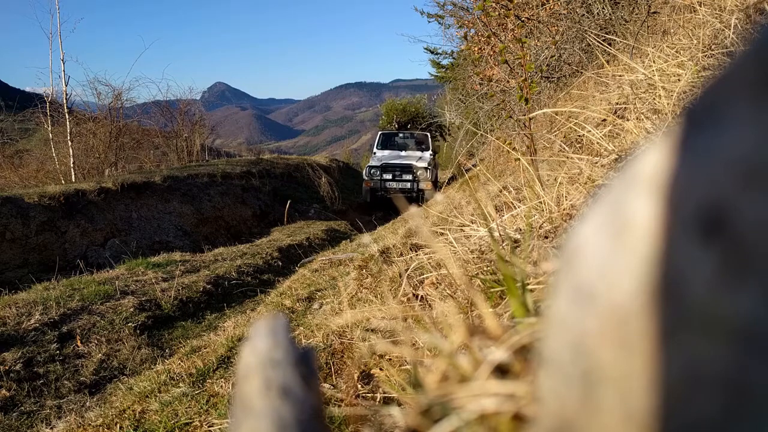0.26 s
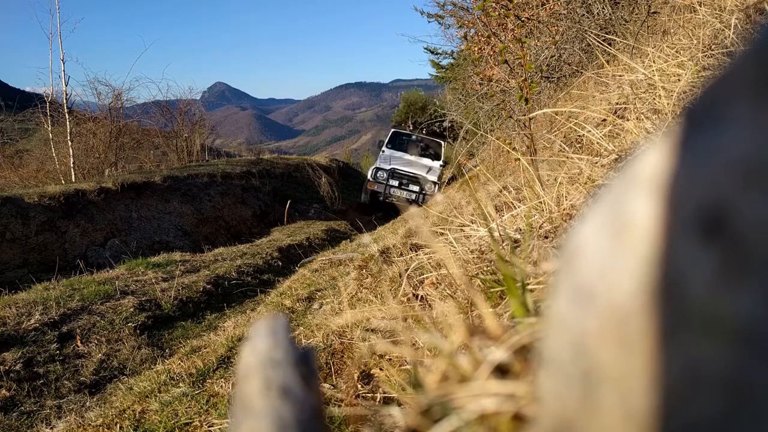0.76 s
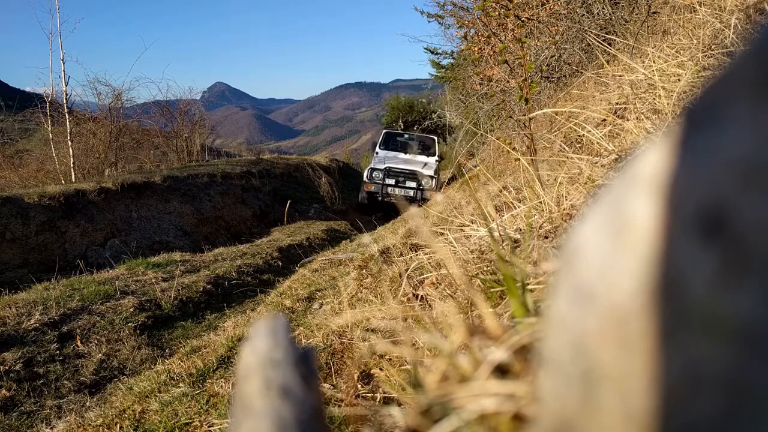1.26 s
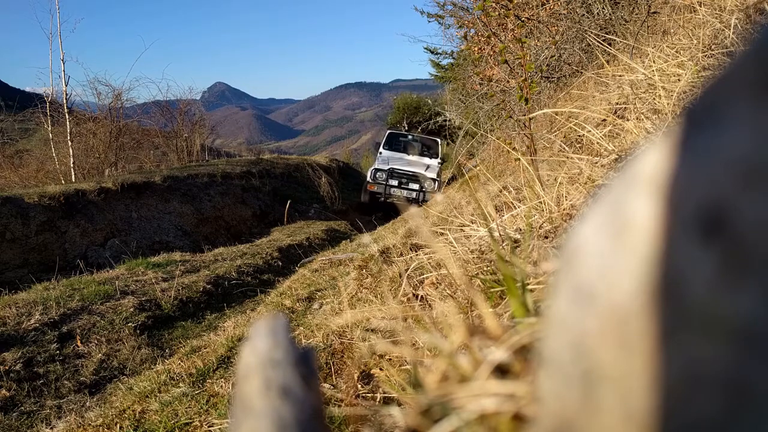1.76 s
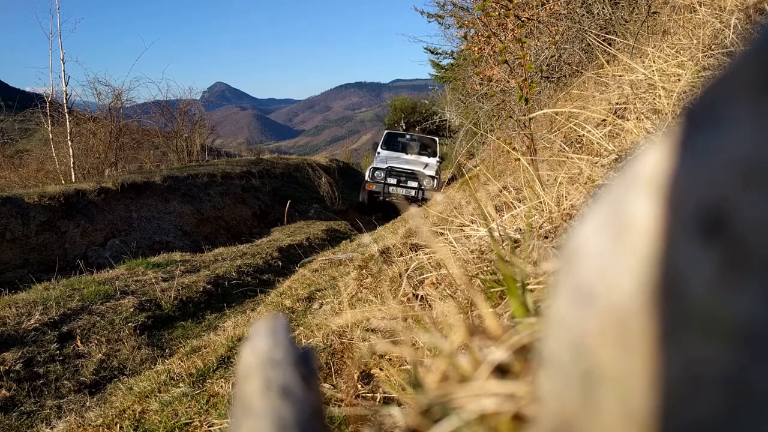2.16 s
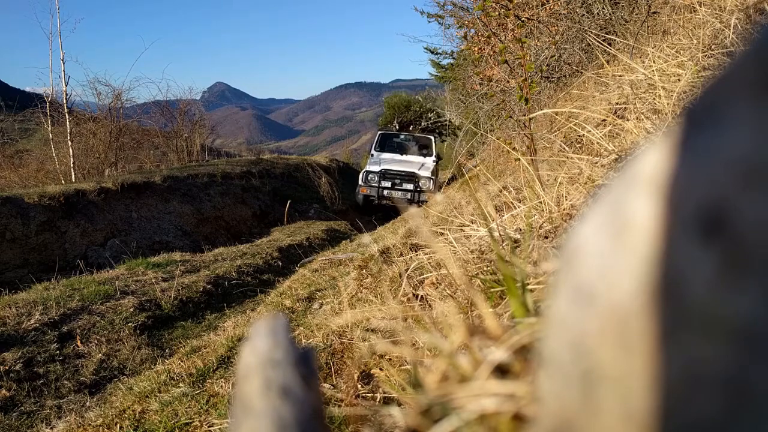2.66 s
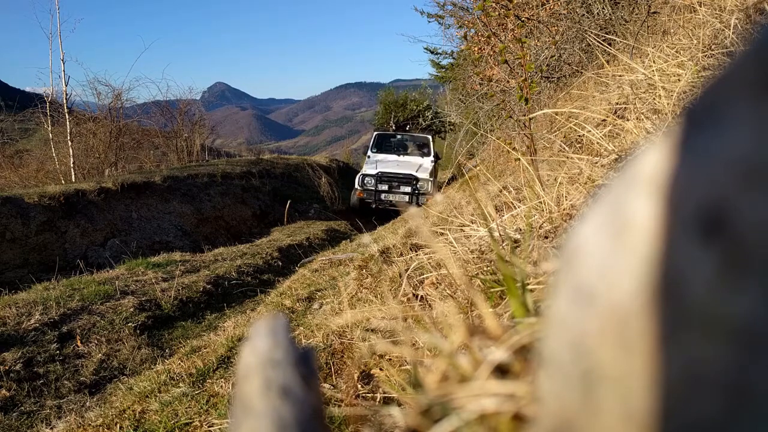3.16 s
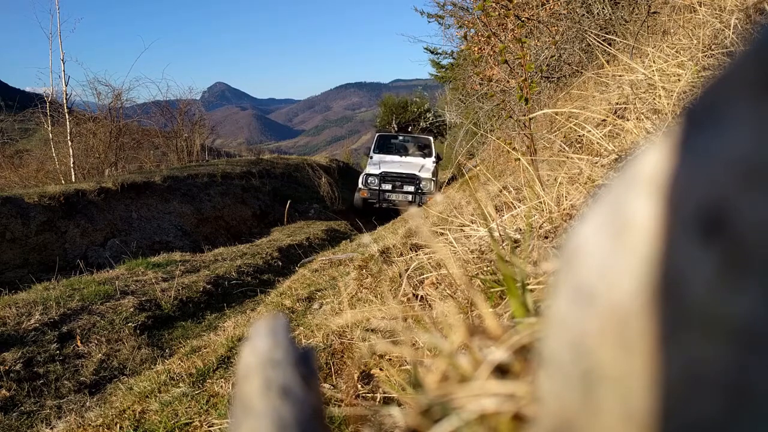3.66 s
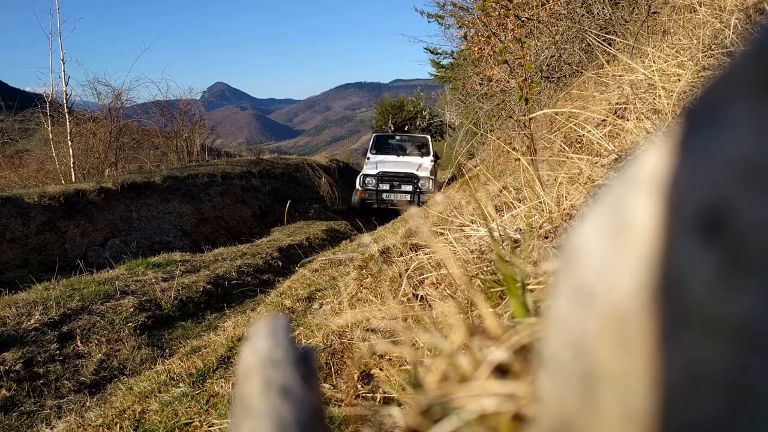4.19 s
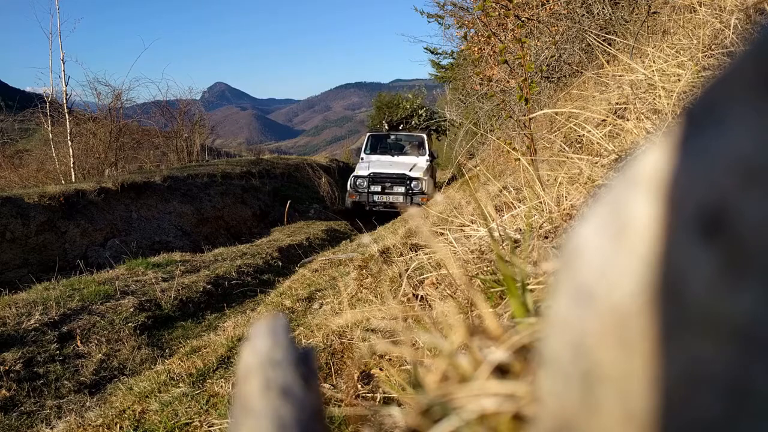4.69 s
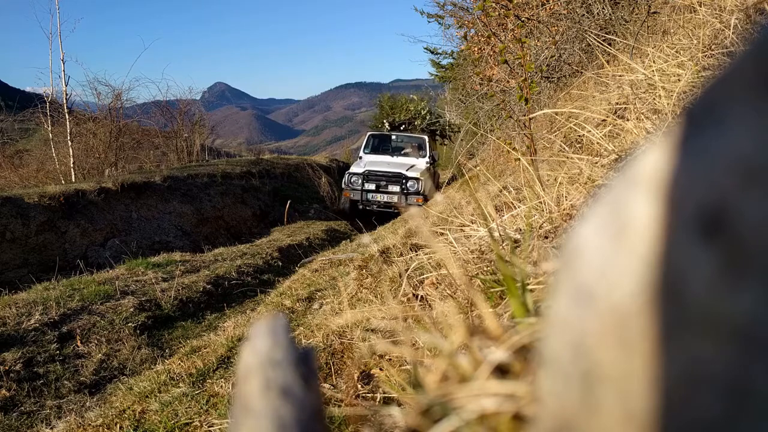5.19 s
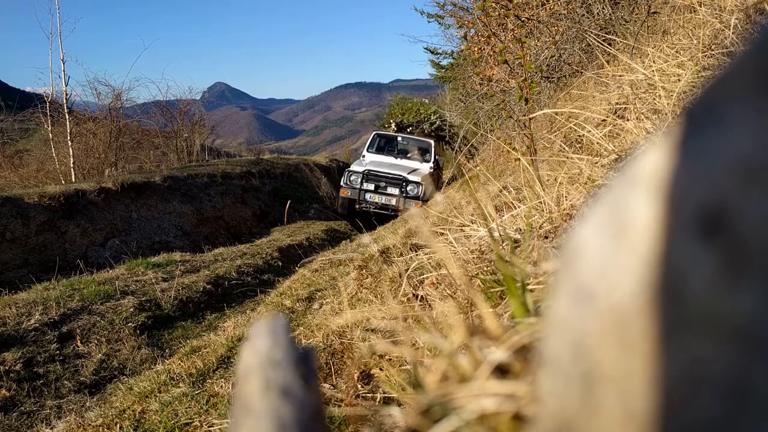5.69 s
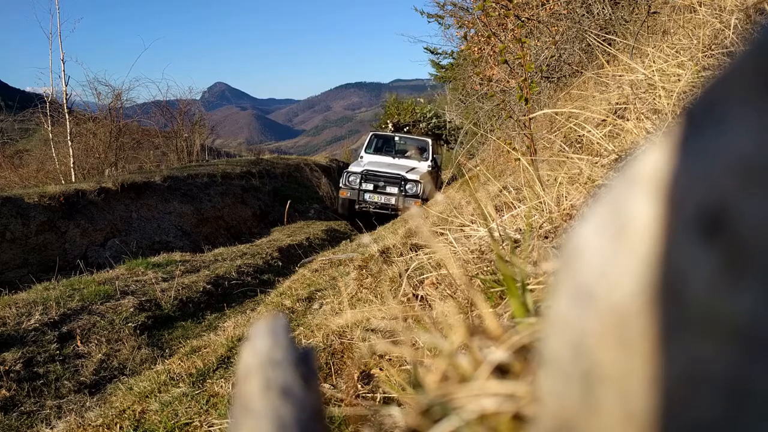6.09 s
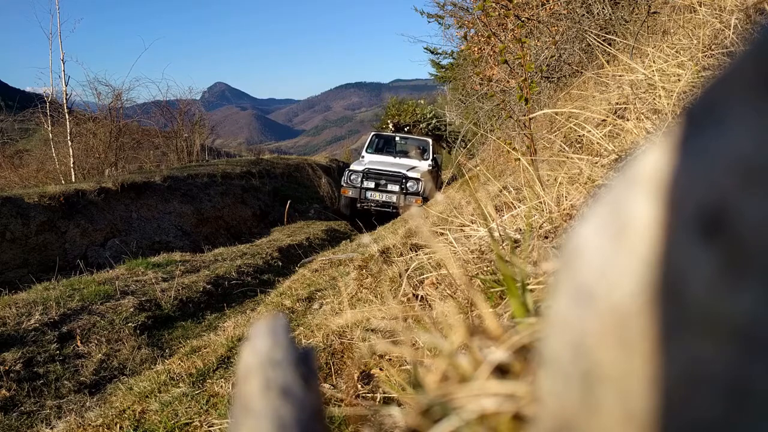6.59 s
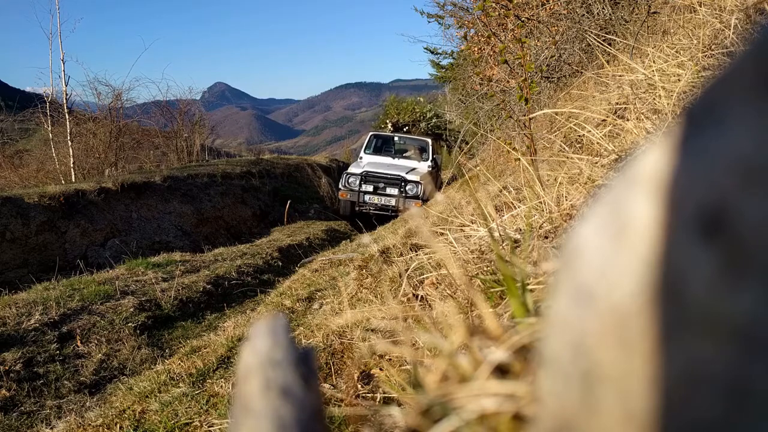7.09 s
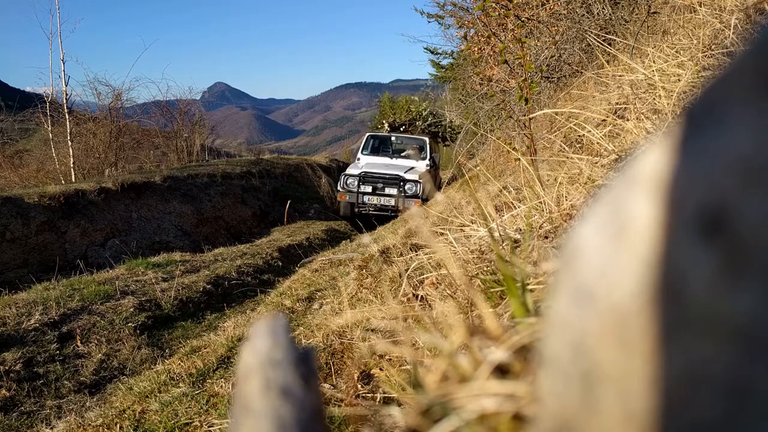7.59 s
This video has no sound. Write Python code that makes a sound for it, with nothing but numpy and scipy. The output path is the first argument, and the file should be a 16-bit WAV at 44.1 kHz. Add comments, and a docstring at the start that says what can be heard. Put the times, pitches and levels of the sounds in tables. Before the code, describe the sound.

Outdoors, a small four-cylinder off-road car works slowly across rutted ground, picked up in mono by a fixed camera microphone with faint hiss and a very faint high whine. At 0 s the engine is high with a strong low boom, falling by 0.6 s to a rough chug. It revs up from 1.5 to 2 s, sinks by 2.4 s, and a low creak comes around 2.7 s. Revs climb again from 3.3 s, peaking loudest near 3.9 s, then drop into a heavy, loaded growl at 4.2 s. A low groan follows at 4.7 s; around 5.1 s the engine almost bogs down, its boom gone, with small squeaks. It recovers through 6 s, then flutters up and down until nearly 8 s, with brighter rumble, metallic clatter and ringing panels. Dry grass and soil fizz quietly under the tyres throughout.

```python
"""Outdoors on rutted ground, a small four-cylinder off-road car crawls about, its engine revving up and down.
The exhaust is three tones locked to the firings, plus noisy puffs sent through ringing pipes and panels.
The engine bay is coloured noise and ticks that get louder with speed. Springs and bushes squeak as short stacks
of overtones, and the tyres rustle as noise with sparse snaps.
The camera adds hiss, a faint whine and a steady offset, and cuts the deep bass and the highest treble."""
import sys
import numpy as np
from scipy import signal
from scipy.fft import rfft, irfft
from scipy.io import wavfile
from scipy.ndimage import uniform_filter1d

SR = 44100
rng = np.random.default_rng(int(sys.argv[2]) if len(sys.argv) > 2 else 0)


def inscribe(sig):
    """Save sig as 16-bit PCM at rate SR to the path in sys.argv[1].

    A 1-D sig is mono; a 2-D sig holds one channel per row.
    Samples are clipped to [-1, 1] before scaling.
    """
    pcm = np.round(np.clip(np.atleast_2d(sig).T, -1, 1) * 32767)
    wavfile.write(sys.argv[1], SR, pcm.astype(np.int16))


N = 346174

# How the engine runs. Each row: time in seconds, firings per second in Hz, firing tone in dB rms,
# load in dB (it lifts the overtones and rumble fully, the clatter and rustle in part).
ENGINE_RUN = [(0.0, 112, -29.5, 3), (0.13, 90.8, -29, -0.5), (0.24, 75.76, -39, 3.5), (0.36, 80, -42, 2.5),
              (0.46, 67.3, -42.5, -1.5), (0.61, 47.9, -42.5, 4), (0.83, 49.9, -41.5, 0),
              (1.2, 48.14, -43, -4), (1.44, 54.62, -40, -2), (1.55, 73.65, -42, 5),
              (1.68, 90.24, -43.5, -1.5), (1.81, 89.1, -38, -3.5), (1.97, 97.34, -43, -2),
              (2.12, 76, -37, -0.5), (2.27, 51.9, -40.5, 8), (2.41, 43.2, -43, 4), (2.64, 52.04, -39, 2),
              (2.75, 48.8, -38, 6.5), (3.21, 55.4, -41.5, -1), (3.37, 72.74, -41.5, 3),
              (3.52, 92.7, -44.5, -2), (3.63, 93, -35, -4), (3.74, 91.75, -37, 1.5),
              (3.87, 114.9, -34, 3.5), (4.07, 87.8, -31.5, 2), (4.15, 66.07, -31, 12.5),
              (4.22, 59.66, -32, 7.5), (4.33, 56.73, -33.5, 5), (4.44, 67.66, -37.5, 4),
              (4.68, 50.2, -39, 2.5), (4.92, 38.96, -50, 3.5), (5.11, 37.05, -81, -1.5),
              (5.3, 37, -66, 0.5), (5.53, 44.94, -46.5, -1), (5.77, 49.07, -41.5, -1),
              (6.23, 53.6, -40, -2.5), (6.44, 76.73, -41.5, 1.5), (6.57, 73.34, -42, 3.5),
              (6.71, 88.07, -46, 5.5), (6.8, 99, -40.5, 3), (6.97, 71.93, -41.5, 7),
              (7.19, 83.25, -43, 4.5), (7.43, 73.73, -40.5, 5.5), (7.61, 93.4, -45, 4.5),
              (7.85, 63.4, -34, 11)]


def gain_of(db):
    """Turns decibels into a factor on the amplitude."""
    return 10 ** (np.asarray(db) / 20)


def evened(x):
    """Scales a signal to an rms of 1."""
    return x / np.sqrt(np.mean(x ** 2) + 1e-20)


def shaped(x, points):
    """Filters x by a spectrum drawn on a log-frequency axis, then scales it to rms 1."""
    points_hz, points_db = np.transpose(points)
    hz = np.fft.rfftfreq(len(x), 1 / SR)
    spectrum_db = np.interp(np.log(hz + 1), np.log(points_hz + 1), points_db)
    return evened(irfft(rfft(x) * gain_of(spectrum_db), len(x)))


def resonate(x, hz, width):
    """A two-pole resonance (width in Hz) of gain 1 at its centre, like a part that rings at one pitch."""
    return signal.lfilter(*signal.iirpeak(hz, hz / width, SR), x)


def drift(per_s):
    """Slow random wandering of about rms 1, with changes up to about per_s Hz."""
    knots_per_s = 200
    knots = rng.standard_normal(int(N / SR * knots_per_s) + 2)
    slow = signal.lfilter(*signal.butter(2, min(per_s, 90), fs=knots_per_s), knots)
    return np.interp(np.arange(N) * knots_per_s / SR, np.arange(len(slow)), evened(slow))


def curves(table):
    """Joins the rows of a table with straight lines: one curve for each column after the time."""
    s, *columns = np.transpose(table)
    return [np.interp(np.arange(N) / SR, s, column) for column in columns]


def swells(events):
    """A dB curve of smooth humps, one for each event (middle in s, length in s, height in dB)."""
    t = np.arange(0, N + 64, 64) / SR  # a coarse grid is enough for such slow humps
    humps = sum(db * np.exp(-(2 * (t - s) / length) ** 2) for s, length, db in events)
    return np.interp(np.arange(N) / SR, t, humps)


def doublings():
    """Engine speed in octaves above idle (negative below it)."""
    idle_hz = 50  # firings per second
    return np.log2(curves(ENGINE_RUN)[0] / idle_hz)


def throttle():
    """How fast the speed climbs, in doublings per second, smoothed over 4000 samples."""
    return uniform_filter1d(np.gradient(doublings()) * SR, size=4000)


def rustle():
    """Tyres crush dry grass and soil: a fine fizz with sparse louder snaps, a little louder with speed."""
    # Colour of the rustle. Each row: frequency in Hz, relative level in dB per Hz.
    rustle_colour = [(4000, -38), (7500, -6), (9000, -0.5), (12000, 0.5), (15700, 2)]
    idle_db, rise_db = -71, 1.5  # base level at idle speed, rise per doubling of speed
    happens = rng.random(N) < 300 / SR  # about 300 snaps per second
    snap_size = gain_of(6.5 * np.minimum(rng.exponential(1, N), 6)) * happens
    snap_fade = signal.lfilter([1], [1, -.97], snap_size)
    snaps = snap_fade * rng.standard_normal(N)
    load_db = curves(ENGINE_RUN)[2]
    # the drift makes uneven waves
    level_db = idle_db + rise_db * doublings() + 0.21 * load_db + 1.1 * drift(12)
    fizz = rng.standard_normal(N)
    return gain_of(level_db) * shaped(fizz + .2 * evened(snaps), rustle_colour)


def squeaks():
    """Springs, bushes and panels slip and shudder: quick, slightly uneven slips give stacks of overtones."""
    # Each row: start in seconds, nominal length in seconds, pitch in Hz, level in dB (midway between
    # the first two partials), fall per overtone in dB, extra level of the even partials in dB.
    slip_events = [(0.049, 0.058, 955, -68, 9, 4), (1.172, 0.076, 210, -55.5, 15.5, -8),
                   (1.311, 0.027, 910, -66, 13, -4), (1.461, 0.14, 516, -72, 19, -9),
                   (1.722, 0.11, 1770, -68, 14, -4), (1.925, 0.077, 926, -63, 2, -2),
                   (1.935, 0.063, 542, -61.5, 14, -2), (2.406, 0.041, 1650, -72, 18, -2),
                   (2.644, 0.041, 1407, -70.5, 16, -5), (2.704, 0.16, 81.3, -46.5, 13.5, 9.5),
                   (2.936, 0.04, 915, -67, 10, -2), (2.977, 0.024, 505, -59, 10, 4),
                   (3.812, 0.051, 1147, -62.5, 10, 0), (3.877, 0.049, 907, -62, 12, -2),
                   (3.964, 0.064, 915, -70, 14, 3), (4.674, 0.18, 80, -40, 9, -3.5),
                   (5.231, 0.044, 928, -65, 6, -5), (5.302, 0.15, 345.5, -58, 19, -20),
                   (5.171, 0.04, 117.1, -47, 8, -11), (5.339, 0.028, 873, -68, 1.6, 8),
                   (5.361, 0.032, 1690, -65.5, 4, -1), (5.541, 0.061, 510.4, -62, 23, -10),
                   (6.7, 0.09, 961, -68, 8, 5), (7.347, 0.09, 465, -60, 7, -6),
                   (7.0, 0.29, 203.2, -53.5, 18, -8), (7.574, 0.097, 1770, -62, 4, -8)]
    out = np.zeros(N)
    waver = drift(40)
    flutter = gain_of(3.0 * drift(60))
    k = np.arange(1, 9)[:, None]  # partial numbers
    for s, length, hz, level_db, fall_db, even_db in slip_events:
        at = np.arange(round(1.136 * length * SR)) + round(s * SR)  # the fades need a little more length
        slips = np.cumsum(hz * (1 + 0.0085 * waver[at])) / SR
        partial_db = level_db - fall_db * (k - 1.5) + even_db * (k % 2 == 0)
        stack = gain_of(partial_db) * np.sin(2 * np.pi * k * slips)
        swell_and_fade = signal.windows.tukey(len(at), .7)
        # squeaks below 400 Hz flutter less
        out[at] += stack.sum(0) * swell_and_fade * flutter[at] ** min(hz / 400, 1)
    return out + 2.2 * resonate(out, 6800, 600)  # the microphone's treble peak


def panels():
    """Two thin panels and the intake box ring: noise in narrow bands that rise and fall."""
    # Each row: frequency in Hz, width in Hz; lower panel, upper panel, intake box.
    panel_modes = [(1260, 30), (1488, 22), (1660, 290)]
    # Ring against the clatter, as the car turns. Each row: time in seconds,
    # lower panel in dB, upper panel in dB, intake box in dB.
    panel_levels = [(0.0, -10, -16, -19), (0.3, -16, -9.5, -6), (0.9, -11, -23, -30), (1.55, -14, -15, -11),
                    (2.05, -6, -21, -9), (2.35, -19, -11, -17), (2.85, -6.5, -21, -4.5),
                    (3.2, -14, -13, -22), (3.45, -10.5, -11, -10.5), (3.87, -15.5, -22, -8.5),
                    (4.57, -7, -26, -20), (5.1, -16, -14, -20), (6.2, -14, -15, -17), (6.4, -28, -11, -7),
                    (6.889, -11, -22, -9.5), (7.05, -20, -8.5, -6), (7.649, -12, -16, -14),
                    (7.85, -23, -5, -4)]
    return sum(gain_of(db) * evened(resonate(rng.standard_normal(N), hz, width))
               for (hz, width), db in zip(panel_modes, curves(panel_levels)))


def firing_tones(hz, firing_db, load_db, firings):
    """The exhaust booms at the firing rate and at two and three times that rate."""
    overtones_db = [-53, -58.5]  # base levels of the second and third order, in dB rms
    # How the exhaust favours an overtone by its pitch. Each row: frequency in Hz, gain in dB.
    overtone_gain = [(72, -3), (96, -1.5), (118, 0), (135, 0), (154, 2.5), (175, -1.5), (200, -1),
                     (245, -1), (340, 4.5)]
    # The firing tone dips or swells. Each row: middle in seconds, length in seconds, change in dB.
    lurches = [(.07, 0.11, -17.5), (.175, 0.04, -16), (.45, 0.14, -2.5), (1.54, 0.11, 5),
               (1.87, 0.064, -19), (2.03, 0.034, -9), (2.15, 0.13, -11), (2.28, .1, 6.5), (2.37, 0.048, -1),
               (2.57, 0.049, -9), (3.14, 0.052, -1), (3.26, 0.042, -10), (3.36, 0.09, 5),
               (3.71, 0.083, -22), (3.99, 0.085, -23), (4.12, .05, -11), (4.41, 0.078, -11),
               (4.59, 0.053, 1), (4.68, 0.085, -5), (6.3, 0.076, 3.5), (6.71, 0.091, -11), (6.82, .04, -9),
               (6.87, .04, 1), (6.94, 0.058, -2), (7.05, .14, 4), (7.19, .05, -2), (7.43, 0.074, -5),
               (7.5, 0.055, 2), (7.61, .06, -7), (7.67, 0.046, 7), (7.74, 0.073, -9)]
    # The overtones sing out or fade for a moment. Each row: middle in seconds, length in seconds,
    # change of the second order in dB, change of the third order in dB.
    overtone_swells = np.array([(0.092, 0.091, -4, -5), (0.294, 0.28, 10.5, -8), (1.0, 0.25, -1, -3),
                                (1.539, 0.13, 6, 2), (1.83, 0.069, 12.5, -1), (2.0, 0.15, 6, 1.5),
                                (2.29, 0.16, 8, 9.5), (2.597, 0.19, 3.5, 9.5), (2.93, .1, 5.5, 0),
                                (3.153, .08, 8, 5.5), (3.402, .12, 7.5, -8), (3.604, 0.089, 9.5, -6),
                                (3.82, 0.096, 4, 2.5), (4.039, .06, 9, -14), (4.268, .2, 7, 4),
                                (4.44, 0.069, 5, 3), (4.8, 0.16, -9, 2), (5.8, .35, -13, 1.5),
                                (6.55, .15, -8.5, -1), (6.748, .14, -1, 2.5), (7.07, 0.15, -0.5, -6),
                                (7.251, .25, -16, 5.5), (7.521, .14, 1, -9), (7.749, .15, -5, -7)])
    gain_hz, gain_db = np.transpose(overtone_gain)
    orders_db = [firing_db + swells(lurches)]
    for k, db in enumerate(overtones_db):
        favour_db = np.interp(np.log((k + 2) * hz), np.log(gain_hz), gain_db)
        moment_db = swells(overtone_swells[:, [0, 1, k + 2]])
        orders_db.append(db + load_db + 1 * throttle() + moment_db + favour_db)  # 1 dB per unit of throttle
    tones = np.zeros(N)
    for k, db in enumerate(orders_db):
        # the higher orders flutter and waver more than the firing tone
        level = np.sqrt(2) * gain_of(db + (1.36 + 0.83 * k) * drift(19.3))
        turns = (k + 1) * firings + 0.05 * k * drift(16.3)
        tones += level * np.sin(2 * np.pi * turns)
    return tones


def exhaust_rumble(drive):
    """Puffs and gushing gas make the exhaust pipe and body panels ring at their own pitches."""
    # Each row: frequency in Hz, nominal width in Hz, level in dB before the tilt.
    pipe_modes = [(79, 9.9, 12), (112.6, 35, 0), (154.3, 33, 6.5), (198.8, 50.5, 7.5), (237.8, 52, 1.5),
                  (299.8, 22.4, 2.5), (348.4, 21.2, 3), (465, 44, -12.5), (518, 11.7, -8.5)]
    # The tilt shifts as the car turns and draws nearer. Each row: time in seconds, tilt in dB per octave.
    rumble_tilt = [(0, 1), (1.5, -2.5), (2.6, -2), (3.8, 1.3), (5.0, 1), (5.8, 3), (6.5, 2.5), (7.1, 4.5),
                   (7.85, 3.5)]
    tilt_db = curves(rumble_tilt)[0]
    pipe = np.zeros(N)
    for hz, width, db in pipe_modes:
        ring = resonate(resonate(drive, hz, 1.17 * width), hz, 1.2 * width)
        pipe += gain_of(db + tilt_db * np.log2(hz / 280)) * ring
    return evened(pipe)


def bay_clatter(firings, gush):
    """Valves and fan: a hiss that throbs with the firings and ticks that ring the castings."""
    # The engine bay as the microphone hears it. Each row: frequency in Hz, relative level in dB per Hz.
    bay_colour = [(240, -0.5), (400, -3), (536, -8), (706, -16), (931, -10.5), (1370, -19), (1620, -14),
                  (2810, -15), (3230, -15), (5440, -14), (6540, -7.5), (8240, -20), (15700, -31.5)]
    # Castings that the clatter rings. Each row: frequency in Hz, width in Hz, mean level in dB.
    castings = [(915, 110, -12), (1110, 150, -7.5), (1650, 21, 9.5), (1770, 17, -2), (1950, 730, -2),
                (2740, 12, 5.5), (2750, 320, -3), (4760, 430, -5.5), (6730, 750, -3.5)]
    flutter = gain_of(0.36 * drift(18) + 0.3 * drift(72))
    hiss = (1 + 0.49 * gush) * flutter * rng.standard_normal(N)
    half_firings = (2 * firings).astype(int)
    ticks = evened(np.diff(half_firings, prepend=0) * gain_of(0.84 * drift(73)))  # valves seating
    rattle = hiss + 0.34 * ticks
    rung = sum(gain_of(db + 3.6 * drift(14)) * resonate(rattle, hz, width) for hz, width, db in castings)
    return shaped(rattle + rung, bay_colour) + panels()


def engine():
    """Firing tones, rough puffs through the pipe and the clatter of the bay, all on one crankshaft."""
    # Strength of each firing in the cycle of four, in dB, before chance is added.
    cylinders_db = np.array([-2.5, -0.5, 3.3, -2])
    # Wheels drop into ruts and the rumble flares. Each row: middle in seconds, length in seconds, rise in dB.
    ruts = [(.35, 0.067, 4.5), (.65, 0.028, 6.5), (1.83, 0.048, 10.5), (1.97, .07, 6), (2.93, 0.053, 12),
            (3.18, 0.095, 10.5), (3.48, 0.077, 7.5), (3.71, 0.091, 8.5), (3.87, 0.067, 7.5),
            (4.15, 0.18, 4.5), (5.2, 0.061, 9), (5.97, 0.065, 9), (6.3, 0.19, 12.5), (6.61, 0.052, 5),
            (6.75, .12, 8), (6.95, 0.08, 5.5), (7.11, .08, 6.5), (7.52, 0.13, 2.5)]
    hz, firing_db, load_db = curves(ENGINE_RUN)
    speed, push, rut_db = doublings(), throttle(), swells(ruts)
    # base dB at idle speed, dB per doubling of speed, dB per unit of throttle, then load and ruts
    rumble_db = -57 + 7 * speed + 0.4 * push + load_db + rut_db
    clatter_db = -66.5 + 11 * speed + 0.43 * push + .3 * load_db + 0.11 * rut_db
    firings = np.cumsum(hz * (1 + .01 * drift(16))) / SR  # running count, slightly uneven
    # every firing is a puff of uneven strength, followed by a gush of turbulent gas
    count = firings.astype(int)
    chance_db = 3.8 * np.clip(rng.standard_normal(N)[count], -2, 2)
    strength = gain_of(cylinders_db[count % 4] + chance_db)
    gush = strength * np.exp(-(firings % 1) / 1.7)
    puffs = evened(np.diff(count, prepend=0) * strength)
    drive = 0.55 * puffs + (0.99 + gush) * rng.standard_normal(N)
    tones = firing_tones(hz, firing_db, load_db, firings)
    rumble = gain_of(rumble_db + 1.66 * drift(10.4)) * exhaust_rumble(drive)
    clatter = gain_of(clatter_db + 0.27 * drift(6)) * bay_clatter(firings, gush)
    return tones + rumble + clatter


def scene():
    """Mixes the tyres, the squeaks and the engine into one channel."""
    return (rustle() + squeaks() + engine())[None]


def record(dry):
    """Adds hiss and whine, cuts the deep bass and the highest treble, then adds a steady offset."""
    # Camera electronics. Each row: frequency in Hz, level in dB rms.
    whine_tones = [(7523, -85), (7583, -84), (7884, -96), (7944, -92)]
    # Still air and camera hiss. Each row: frequency in Hz, relative level in dB per Hz.
    hiss_colour = [(20, -45), (50, -0.5), (100, -9), (190, -15.5), (350, -19), (690, -32.5), (1280, -34),
                   (2250, -42), (5340, -40), (6630, -36), (8450, -44.5), (15700, -59)]
    turns = np.cumsum(1 + 0.000376 * drift(3.7)) / SR  # seconds, running slightly unevenly
    whine = sum(np.sqrt(2) * gain_of(db) * np.sin(2 * np.pi * hz * turns) for hz, db in whine_tones)
    hiss = gain_of(-52) * shaped(rng.standard_normal(N), hiss_colour)
    bass_cut = signal.butter(6, 36, "high", fs=SR, output="sos")
    treble_cut = signal.firwin(1023, 15740, window=("kaiser", 9), fs=SR)
    without_bass = signal.sosfilt(bass_cut, dry + hiss + whine)
    offset = -.0009  # steady voltage of the converter
    return signal.oaconvolve(without_bass, treble_cut[None], "same") + offset


dry = scene()
out = record(dry)
inscribe(out)
```